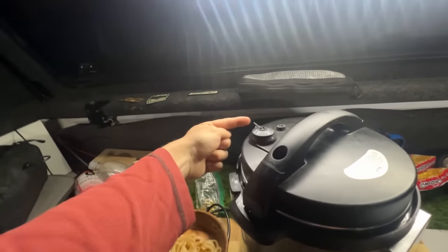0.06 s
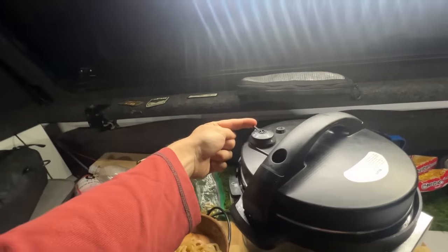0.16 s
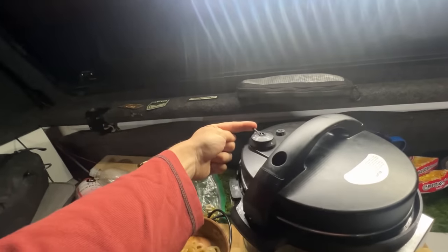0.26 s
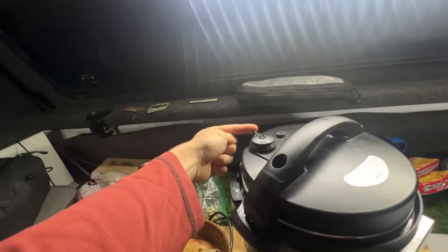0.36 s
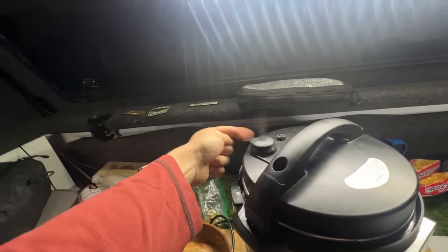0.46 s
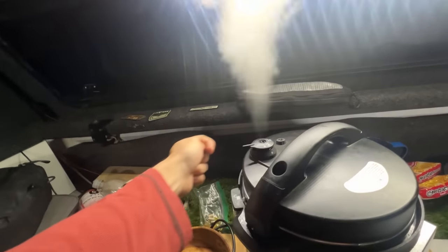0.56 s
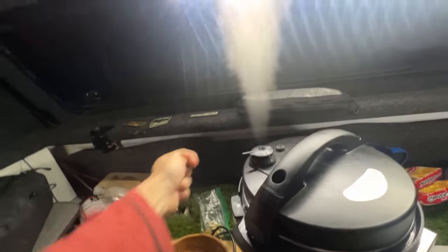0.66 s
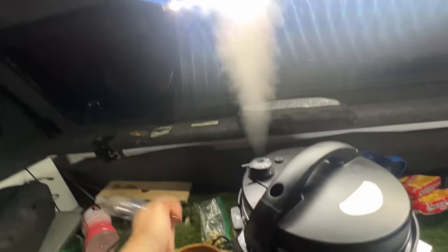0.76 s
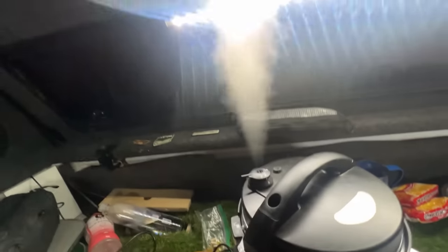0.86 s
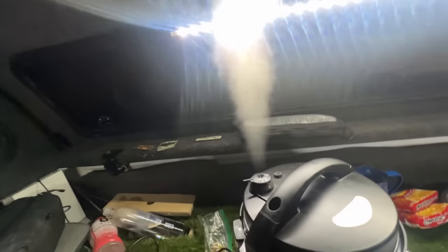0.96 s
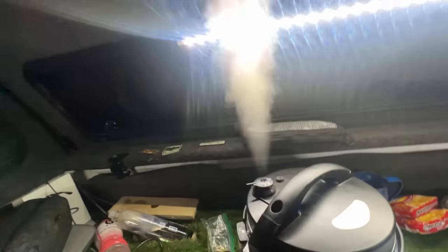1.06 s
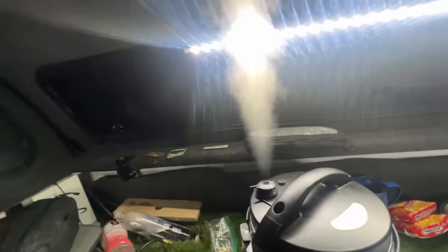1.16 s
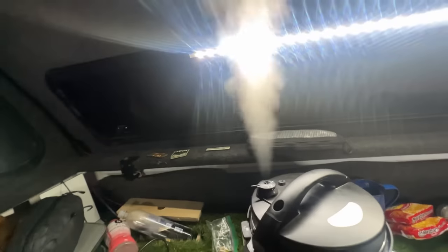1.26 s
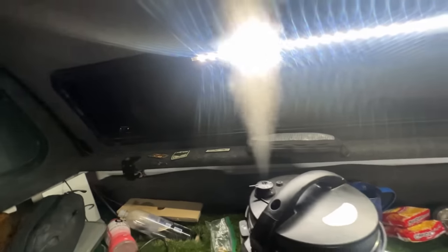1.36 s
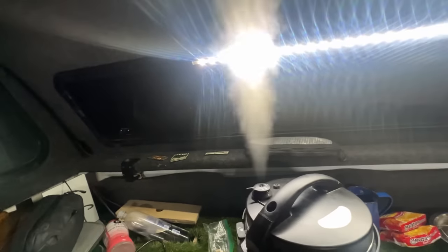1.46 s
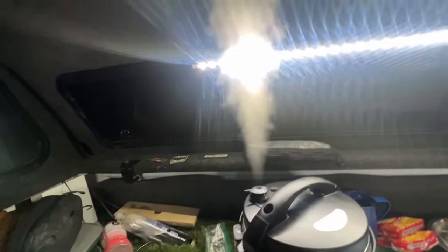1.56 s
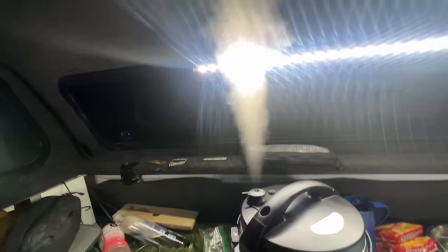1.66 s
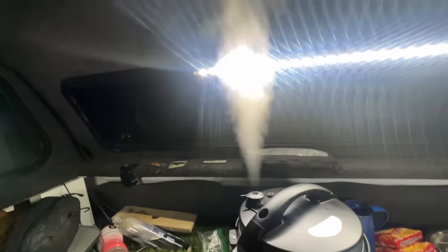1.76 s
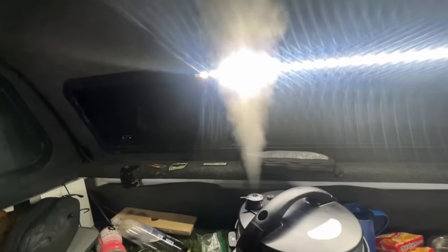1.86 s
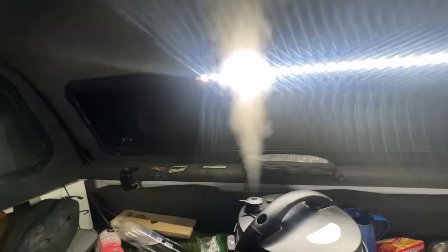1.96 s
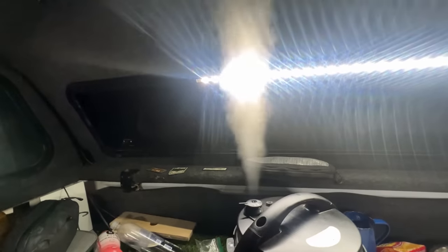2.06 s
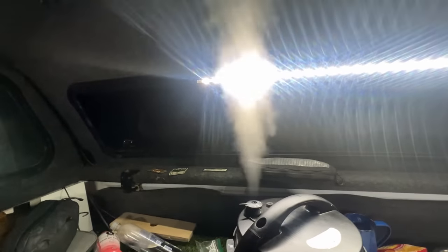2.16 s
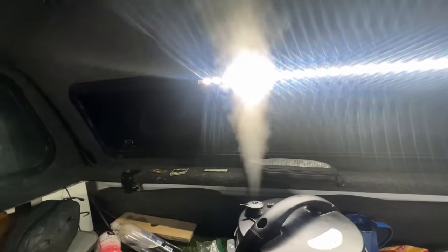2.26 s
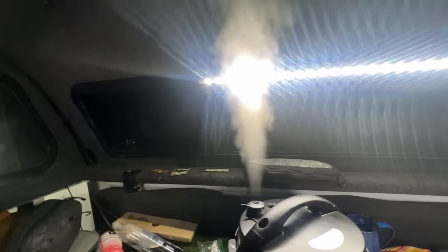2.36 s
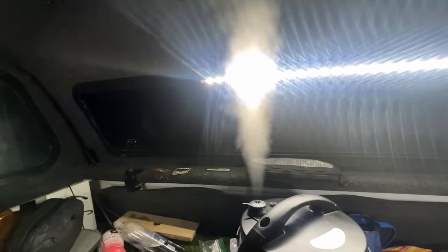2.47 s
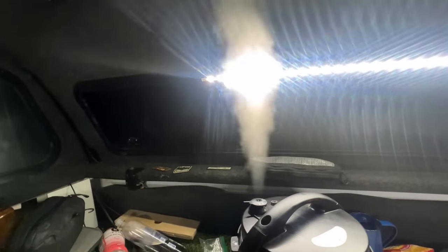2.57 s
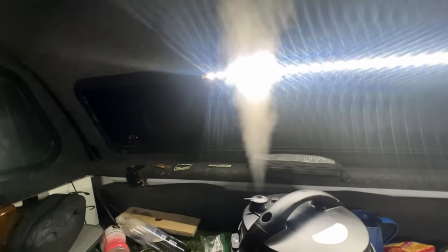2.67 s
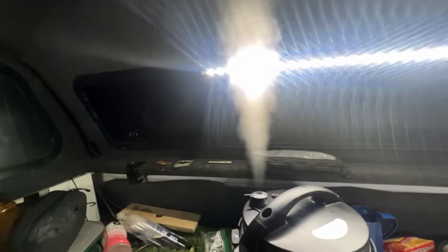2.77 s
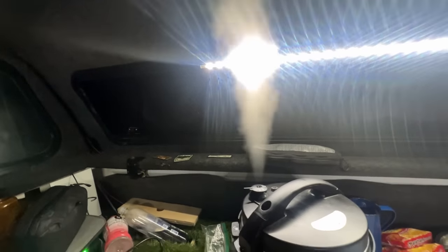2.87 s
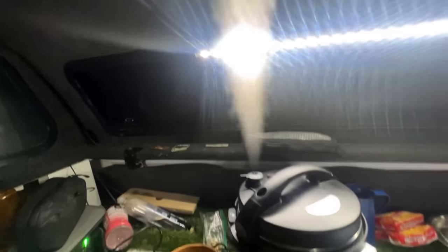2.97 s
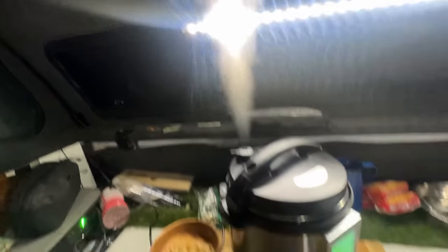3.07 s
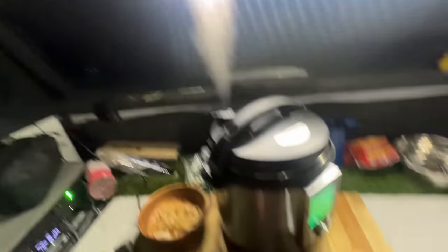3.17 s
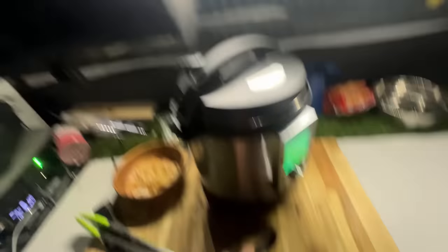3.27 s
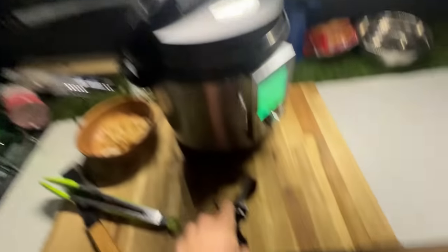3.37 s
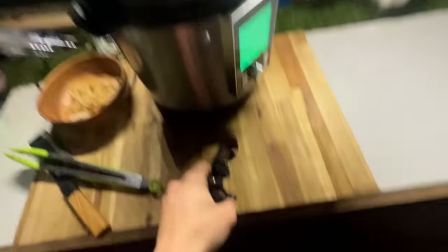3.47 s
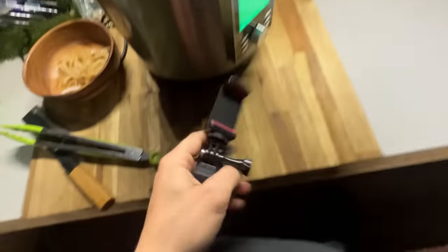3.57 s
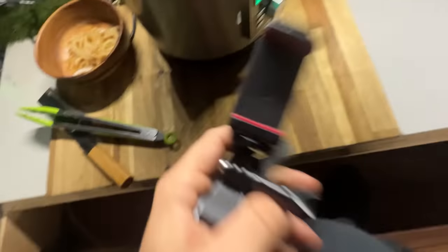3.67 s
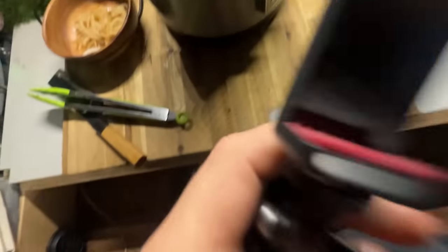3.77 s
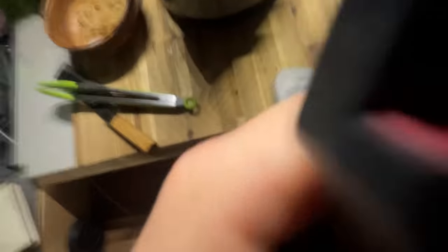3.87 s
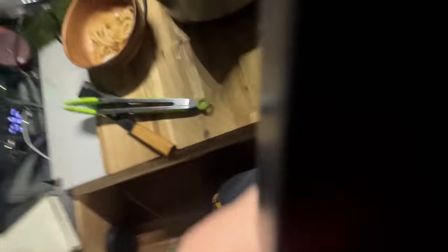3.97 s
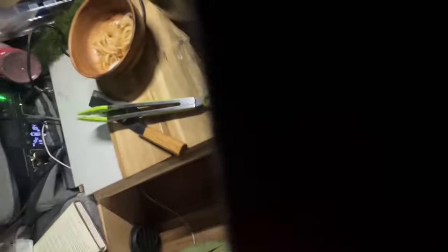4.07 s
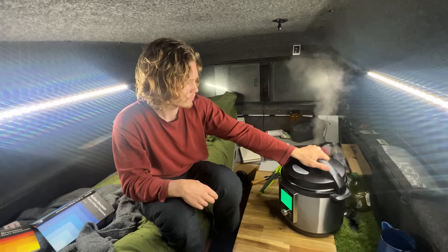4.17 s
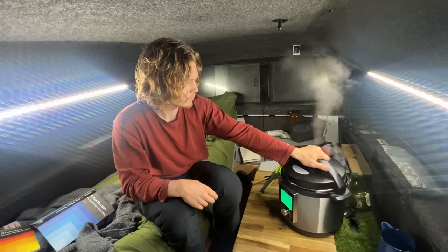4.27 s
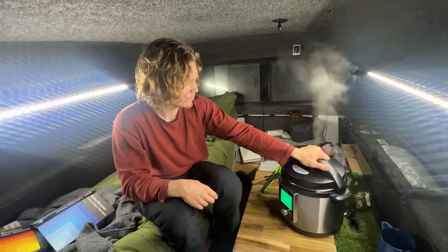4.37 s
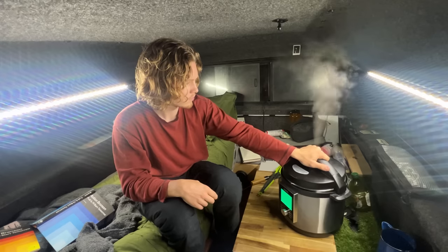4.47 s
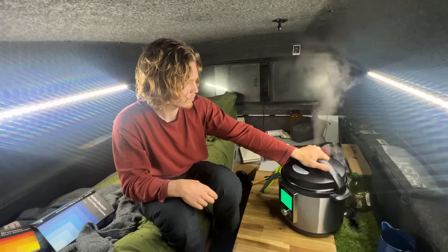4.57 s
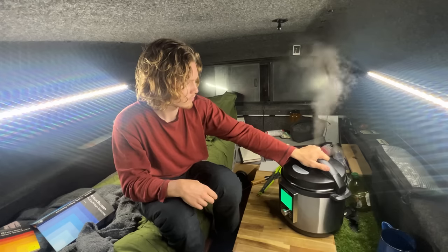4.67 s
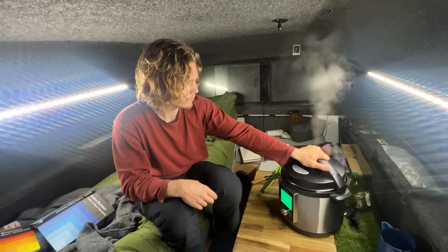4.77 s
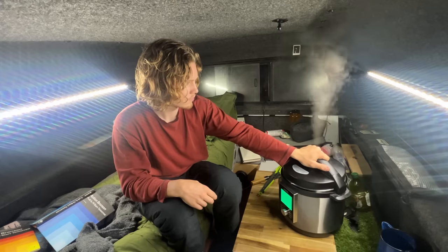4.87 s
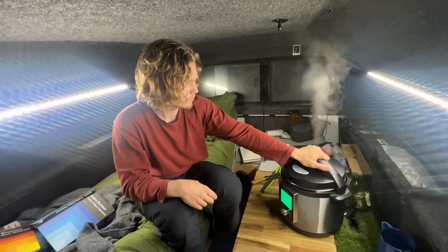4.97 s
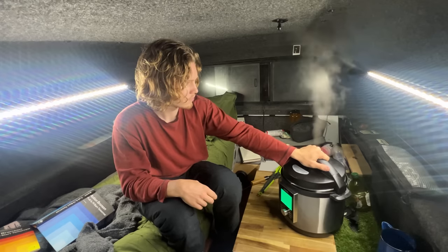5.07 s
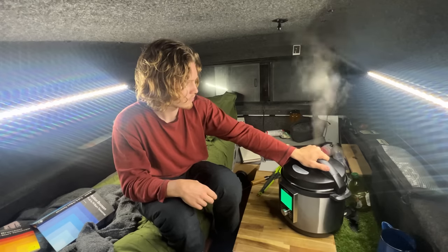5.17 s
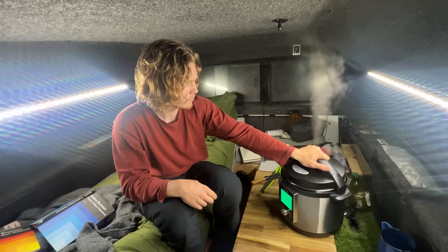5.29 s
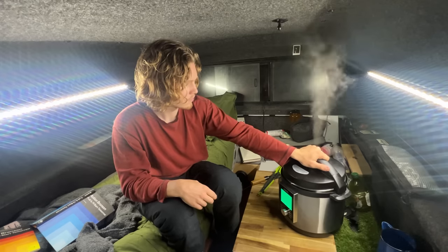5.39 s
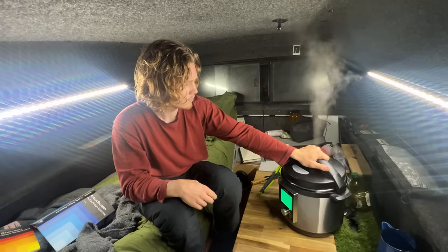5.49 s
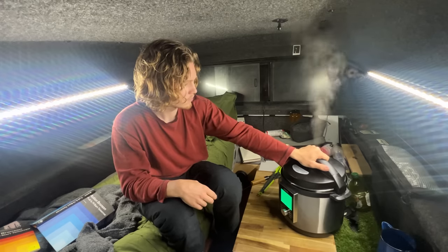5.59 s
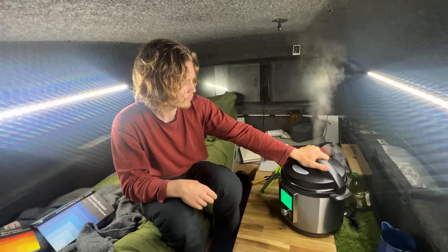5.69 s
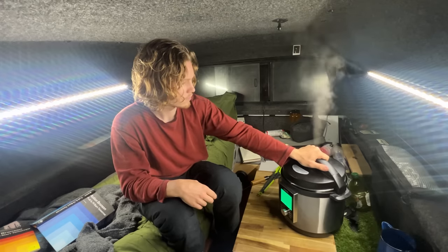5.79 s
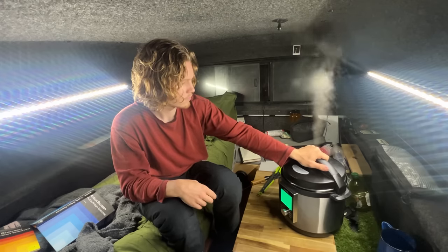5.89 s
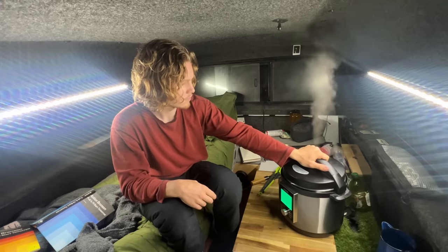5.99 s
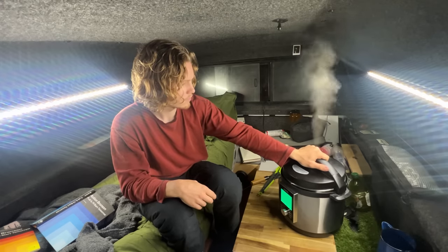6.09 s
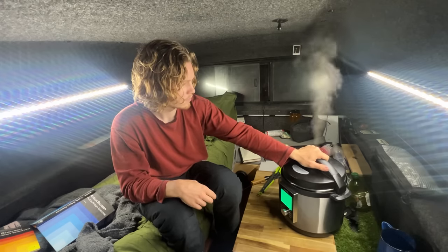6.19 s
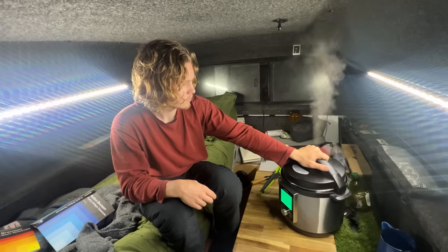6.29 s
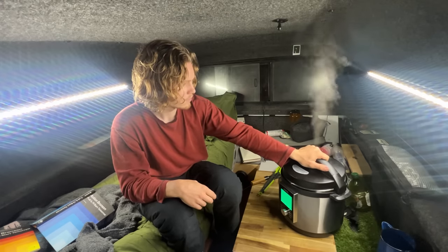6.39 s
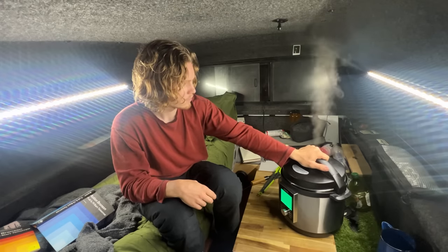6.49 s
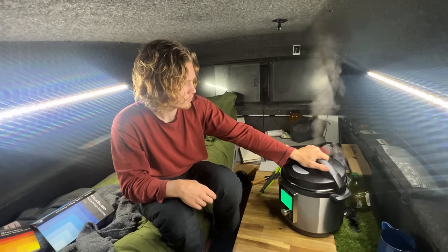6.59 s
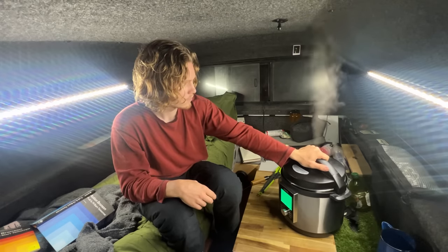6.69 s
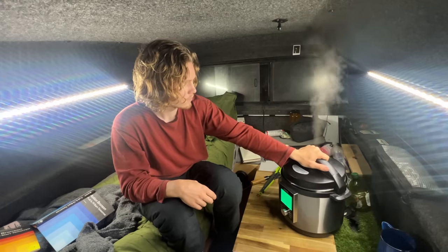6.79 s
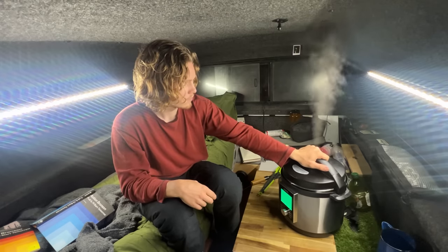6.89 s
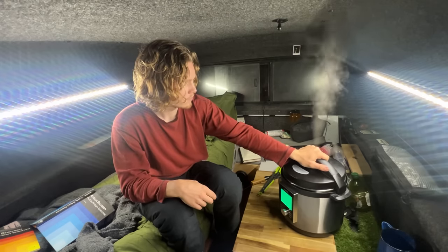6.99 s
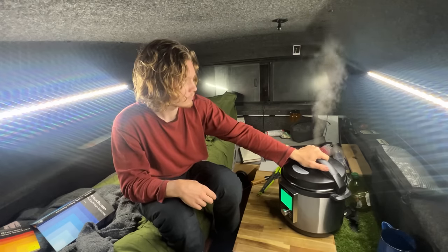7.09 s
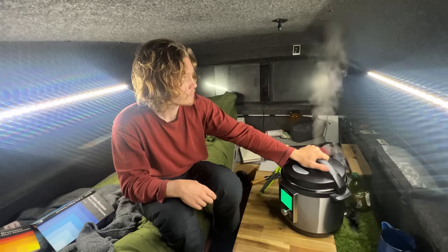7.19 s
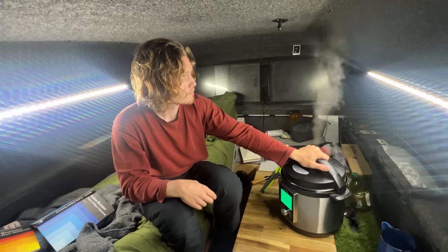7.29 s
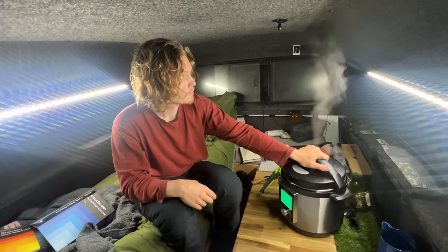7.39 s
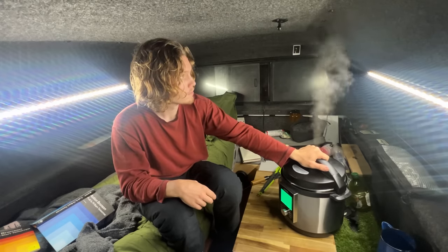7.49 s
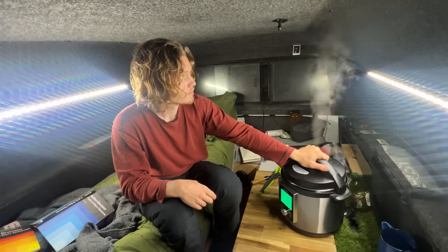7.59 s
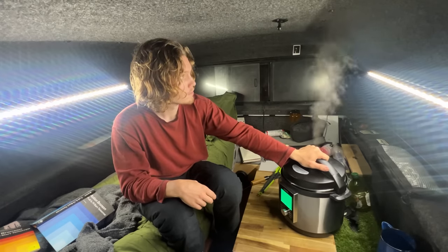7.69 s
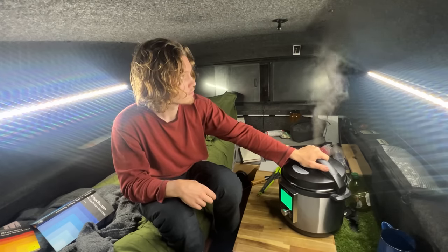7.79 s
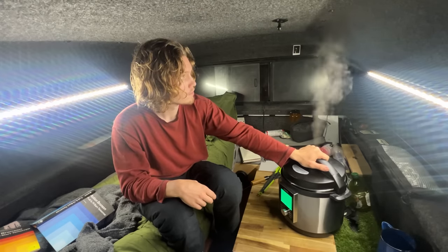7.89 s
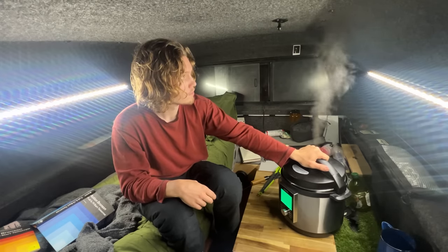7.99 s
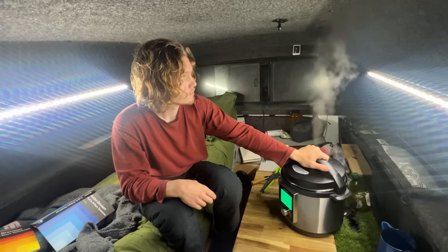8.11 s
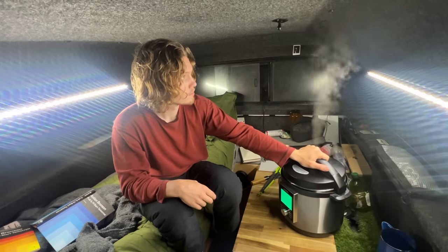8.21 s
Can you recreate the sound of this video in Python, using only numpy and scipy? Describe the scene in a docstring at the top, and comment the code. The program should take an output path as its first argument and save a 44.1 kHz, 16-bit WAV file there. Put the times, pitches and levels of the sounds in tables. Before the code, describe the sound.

Close hand-held stereo microphone in a cramped camper. A soft fan drone plays alone for under half a second, a brief valve scrape follows, and pressurised steam erupts in a harsh sustained hiss. It bleeds off gradually, changes tone as the camera turns away, is interrupted by hard handling knocks near four seconds, then continues quieter and further off, leaning left, with the fan rumbling beneath until the end.

```python
"""A fan drones in a small camper: fuzzy hum, rumble and whirr from shaped noise, over thin air noise and a faint whine.
A finger brushes the valve of an electric pressure cooker, then flicks it open with a scrape of stick-slip ticks.
Steam hisses out over a lower roar from the vent pipe (shaped noise) and rattles the valve on its seat.
The hand-held camera with its two microphone ports is near, turns away, is knocked (decaying modes) and rubbed,
and ends further off with its right port shaded."""
import sys
import numpy as np
from scipy import signal
from scipy.fft import rfft, irfft, next_fast_len
from scipy.io import wavfile
from scipy.ndimage import uniform_filter1d, map_coordinates

SR = 44100
rng = np.random.default_rng(int(sys.argv[2]) if len(sys.argv) > 2 else 0)


def unload_wav(signal):
    """Save mono or channel-first audio to the path in sys.argv[1] as 16-bit WAV at rate SR, clipped to [-1, 1]."""
    wavfile.write(
        sys.argv[1],
        SR,
        np.round(np.clip(np.atleast_2d(signal).T, -1, 1) * 32767).astype(np.int16),
    )


N = 363825

# knocks on the camera: (time [s], level [dB], starting pitch [Hz], ring t60 [s],
# thud relative to the level [dB], cut of ring and crack at the right port [dB])
KNOCK_ROWS = [(3.8798, -9, 1500, .0055, -7, 13), (3.8846, -15, 1650, .007, 3, 16),
              (3.897, -33, 900, .008, 3, 18), (3.925, -33, 1740, .013, 2, 23),
              (3.949, -30, 800, .006, 0, 20), (3.9531, -17, 6400, .004, -20, 20),
              (3.9534, -9.5, 1700, .0125, -13, 17), (3.976, -34, 1600, .01, 7, 18),
              (4.014, -32, 1420, .016, -10, 16), (4.039, -33, 1450, .01, -6, 16),
              (4.051, -31, 1500, .01, -6, 16), (4.057, -24.5, 1290, .008, -5, 20),
              (4.214, -35, 1420, .01, -10, 8), (4.281, -36, 1340, .01, -6, 10),
              (4.3146, -17, 1550, .013, 0, 18), (4.3335, -34, 700, .01, 19, 10),
              (4.336, -25, 1200, .018, 0, 19), (4.3955, -31, 1500, .01, 0, 14)]
# jet treble, near and turned: (frequency [Hz], relative density [dB])
CLOSE_TREBLE = [(9500, -9.5), (10600, -7), (11500, -16), (12300, -16), (13200, -22.5), (14500, -17.5),
                (15700, -16.5)]
# likeness of the channels, near and turned: (frequency [Hz], left-right likeness [0-1])
CLOSE_ALIKE = [(700, .6), (1500, .75), (2300, .55), (2900, .6), (3800, .45), (5500, .35), (8300, .6),
               (9500, 1)]
# phase lead of the right port, bent by the turned camera body: (frequency [Hz], lead [rad])
TURNED_PHASE = [(200, 0.1), (1000, -.2), (2100, 0), (2700, -.7), (3500, -1.6), (4300, -2.8), (6000, -6.3),
                (8500, -7.5), (9500, -9)]


def amp(db):
    """Linear gain of a level in dB."""
    return 10 ** (np.asarray(db) / 20)


def unit(x):
    """x scaled to an rms of 1."""
    return x / np.sqrt(np.mean(x ** 2) + 1e-20)


def along(points, hz):
    """Values of (frequency, value) points, joined on a log frequency axis."""
    f, v = np.transpose(points)
    return np.interp(np.log(hz + 1), np.log(f + 1), v)


def curves(table):
    """One value per sample for each column after the time."""
    s, *cols = np.transpose(table)
    return [np.interp(np.arange(N) / SR, s, c) for c in cols]


def wobble(rate):
    """A smooth random curve, rate knots a second."""
    knots = rng.standard_normal(int(N * rate / SR) + 4)
    return map_coordinates(knots, [np.arange(N) * rate / SR])


def scatter(hz, step_hz):
    """A smooth random curve over frequency: what many small echoes do to the phase."""
    knots = rng.standard_normal(int(SR / 2 / step_hz) + 4)
    return map_coordinates(knots, [hz / step_hz])


def filtered(x, response):
    """x times a complex response of frequency."""
    m = next_fast_len(N + 8192)
    return irfft(rfft(x, m) * response(np.fft.rfftfreq(m, 1 / SR)), m)[..., :N]


def bumps_db(modes, hz):
    """Rounded peaks on a spectrum, in dB."""
    return sum(db / (1 + np.square(np.square(2 * (hz - c) / w))) for c, w, db in modes)


def resonances(modes, hz):
    """Causal response of a few damped modes of alternating sign."""
    total = 0
    for k, (c, w, db) in enumerate(modes):
        damping = 1j * hz * w
        total = total + (-1) ** k * amp(db) * damping / (c * c - hz * hz + damping)
    return total


def patchy(patchy_db, ripple_db=0, ripple_s=1):
    """Two unrelated noises that share short patches of gain and a fine spectral ripple that drifts."""
    z = signal.stft(rng.standard_normal((2, N)), nperseg=1024)[2]

    def field(bins, s):
        across = uniform_filter1d(rng.standard_normal(z.shape[1:]), bins, 0)
        return unit(uniform_filter1d(across, max(round(s * SR / 512), 1), 1))

    gain_db = patchy_db * field(10, .05) + ripple_db * field(2, ripple_s)
    return signal.istft(z * amp(gain_db), nperseg=1024)[1][:, :N]


def pair(noises, gain, alike, lead=lambda hz: 0 * hz):
    """Stereo noise with a gain for each channel, a likeness and a phase lead of the right channel."""
    m = next_fast_len(N + 8192)
    hz = np.fft.rfftfreq(m, 1 / SR)
    same, other = rfft(noises, m)
    turn = np.arccos(np.clip(along(alike, hz), 0, 1)) / 2
    left = (np.cos(turn) * same + np.sin(turn) * other) * np.exp(-1j * lead(hz))
    right = np.cos(turn) * same - np.sin(turn) * other
    return irfft(gain(hz) * np.array([left, right]), m)[..., :N]


def rubbing(gain, modes, slips_per_s, smooth, lean_db):
    """Stick-slip ticks of uneven size, with some smooth noise, ring a part while it is rubbed."""
    ticks = (rng.random(N) < slips_per_s / SR) * rng.standard_normal(N)
    slips = ticks + smooth * rng.standard_normal((2, N))
    ring = unit(filtered(slips, lambda hz: resonances(modes, hz) / (1 + 1j * hz / 2500) ** 2))
    return gain * ring * amp([[lean_db / 2], [-lean_db / 2]])


def strokes(rows, rise_db_per_s, fall_db_per_s):
    """Gain of strokes that rise, hold and die away."""
    t = np.arange(N) / SR
    total = 0
    for s, hold, db in rows:
        rise_db = rise_db_per_s * np.clip(s - t, 0, None)
        fall_db = fall_db_per_s * np.clip(t - s - hold, 0, None)
        total = total + amp(db - rise_db - fall_db)
    return total


def cabin():
    """A fan's hum, rumble and whirr, noise through modes and slopes, over thin air noise and a whine."""
    # modes of hum (applied twice) and whirr: (frequency [Hz], width [Hz], relative level [dB])
    hum_modes = [(177.3, 38.6, 23.5), (213.4, 22, -6)]
    whirr_modes = [(279.4, 7.7, 5.5), (346, 33, -5), (416.7, 18, -4.5), (462, 36, -10.5), (592, 14, -21.5)]
    # (frequency [Hz], relative density [dB])
    rumble_slope = [(15, -52), (25, -31), (43, -33), (81, -13), (150, -12), (200, -32), (330, -120)]
    # (frequency [Hz], left-right likeness [0-1])
    fan_alike = [(60, 1), (170, 0.91), (280, 1), (600, 0.092)]
    # (time [s], hum level [dB], rumble level [dB], whirr level [dB]); steady after the last row
    fan_levels = [(0, -36, -48.5, -58), (.15, -49, -48, -62.5), (.6, -43.5, -48, -58), (1.2, -49, -52, -60),
                  (1.72, -53, -59.5, -64), (1.9, -64.5, -70, -74), (2.2, -57, -65, -109),
                  (2.45, -52, -77, -101), (2.75, -54.5, -60.5, -75), (3.05, -55.5, -63, -57.5),
                  (3.27, -69, -63, -66), (3.7, -60.5, -73, -90), (3.85, -53, -47.5, -56),
                  (4.05, -45, -42.5, -67), (4.3, -47, -38.5, -43.5), (4.47, -39, -39.5, -52),
                  (5.4, -43.5, -38, -50.5)]
    # quiet cabin air: (frequency [Hz], relative density [dB])
    air_slope = [(300, -5.5), (600, -18.5), (1000, -17.5), (1900, -18.5), (2400, -31), (4000, -35.5),
                 (7000, -33.5), (9000, -36), (11000, -72), (12000, -120)]
    # a faint hiss band in the air: (frequency [Hz], width [Hz], height [dB])
    air_bumps = [(7500, 290, 11)]
    whine_hz, whine_db = 1276, -70

    def voices(hz):
        hum = resonances(hum_modes, hz) ** 2
        whirr = resonances(whirr_modes, hz) * (hz > 225)
        return np.array([hum, amp(along(rumble_slope, hz)), whirr])[:, None]

    def air_gain(hz):
        return amp(along(air_slope, hz) + bumps_db(air_bumps, hz))

    hum_db, rumble_db, whirr_db = curves(fan_levels)
    hum, rumble, whirr = map(unit, pair(rng.standard_normal((2, N)), voices, fan_alike))
    fan = amp(hum_db) * hum + amp(rumble_db) * rumble + amp(whirr_db) * whirr
    air = unit(pair(patchy(2.2), air_gain, [(1000, 0.033)]))
    air_db = -41.5 + .24 * whirr_db  # the air noise sinks a little with the whirr
    whine_phase = 2 * np.pi * whine_hz * np.arange(N) / SR + .6 * wobble(20)
    whine = np.sqrt(2) * np.sin(whine_phase) * amp(whine_db + 1.4 * wobble(14))
    return fan + amp(air_db) * air + whine


def finger_brush():
    """A finger brushes the valve: dense small slips through two broad modes."""
    # (time [s], hold [s], level [dB])
    brush_strokes = [(.235, .004, -66)]
    # (frequency [Hz], width [Hz], relative level [dB])
    brush_modes = [(2500, 1300, -2), (4500, 2700, -1)]
    gain = strokes(brush_strokes, rise_db_per_s=2500, fall_db_per_s=450)
    return rubbing(gain, brush_modes, slips_per_s=2400, smooth=.3, lean_db=5)


def valve_scrape():
    """The valve creeps, then turns in jerks: stick-slip ticks ring its modes."""
    # (time [s], hold [s], level [dB])
    turn_strokes = [(.431, .017, -50), (.453, 0.014, -25), (.482, 0.016, -32)]
    # (frequency [Hz], width [Hz], relative level [dB])
    valve_modes = [(334, 74, -3), (590, 33, 7), (900, 93, 4), (1240, 350, -0.5)]
    gain = strokes(turn_strokes, rise_db_per_s=3500, fall_db_per_s=600)
    return rubbing(gain, valve_modes, slips_per_s=620, smooth=0.21, lean_db=2.5)


def pressure_db():
    """Level of hiss, middle and roar: a leak, a blast that bleeds off, a slow sag as the pot empties."""
    leak_s, open_s, opening_s = 0.4513, .463, 0.0014  # the valve leaks first, then opens fully
    # each list: hiss, soft middle, vent roar
    leak = np.c_[[-31, -11, -24]]  # dB under the full jet
    full = np.c_[[-17, -37, -30.5]]  # dB at opening, ahead of the camera's gains
    blast = np.c_[[4.5, 7.5, 7.5]]  # dB lost as the first surplus of pressure bleeds off
    bleed = np.c_[[0.82, 0.39, 0.53]]  # time constant of that loss, s
    sag = np.c_[[1.5, 1.08, 0.99]]  # dB per s
    t = np.arange(N) / SR
    since = np.clip(t - open_s, 0, None)
    shut = leak * np.clip(1 - since / opening_s, 0, 1) - 200 * (t < leak_s)
    return full + shut - blast * (1 - np.exp(-since / bleed)) - sag * since


def jet(noises, spectra, walls, treble, treble_db, alike, phase, blur):
    """The jet in one camera place: turbulence noise as hiss, soft middle and vent roar of rms 1 each."""
    treble_hz, delay_s = 9500, 12.8 / SR  # above treble_hz the left channel is delayed and inverted
    # how much small echoes blur the phase: (frequency [Hz], share [0-1])
    echo_share = [(1000, 1), (1500, .4), (4000, .4), (5000, 1)]

    def bands(hz):
        top_db = along(treble, hz) + treble_db
        colour_db = [np.where(hz > treble_hz, top_db, along(s, hz) + bumps_db(w, hz))
                     for s, w in zip(spectra, walls)]
        colour = amp(colour_db) * hz ** 3 / (hz ** 3 + 550 ** 3)  # low cut
        dull = 1 / (1 + (hz / 4200) ** 12)
        roar = 1 / (1 + (hz / 2500) ** 12)
        return np.array([colour * (1 - dull), colour * (dull - roar), colour * roar])

    def lead(hz):
        echoes = blur * along(echo_share, hz) * scatter(hz, step_hz=89.72)
        delayed = np.pi + 2 * np.pi * hz * delay_s
        return np.where(hz > treble_hz, delayed, along(phase, hz) + echoes)

    # one shared noise comes to feed both channels just above treble_hz
    return [unit(band) for band in pair(noises, bands, alike + [(treble_hz + 400, 1)], lead)]


def near_jet():
    """The jet close by, coloured by reinforcements from the close cabin walls."""
    # jet at each port: (frequency [Hz], relative density [dB])
    left = [(700, -23.5), (1000, -21), (1500, -12), (2200, -15), (2700, -11.5), (3100, -5), (3600, -7),
            (4200, -9.5), (5200, -7), (6300, -4.5), (7500, -3), (8600, -4), (9600, -9)]
    right = [(700, -27.5), (1000, -25.5), (1500, -14), (2200, -18), (2700, -10.5), (3100, -5.5),
             (3600, -10.5), (4200, -10.5), (5200, -17), (6300, -12.5), (7500, -8), (8600, -4), (9600, -9.5)]
    # wall reinforcements: (frequency [Hz], width [Hz], height [dB])
    left_walls = [(1340, 110, 4.5), (1560, 160, 5), (1730, 140, 6.5), (2000, 100, 4), (4470, 200, 2),
                  (4900, 250, 3), (5830, 150, 4), (6120, 80, 4), (6250, 100, 5), (6500, 90, 4),
                  (7200, 200, 3), (7700, 120, 3), (8250, 130, 5), (8490, 100, 4), (8830, 100, 3)]
    right_walls = [(1150, 120, 3), (1600, 360, 6), (1990, 90, 5), (4900, 120, 4), (6800, 150, 5),
                   (7080, 100, 3), (7820, 150, 3), (8270, 100, 3), (8620, 160, 5), (9300, 150, 2)]
    # phase lead of the right port, bent by the camera body: (frequency [Hz], lead [rad])
    near_phase = [(200, 0.1), (600, -2.1), (1100, 0.1), (1600, 1.8), (2000, 0.1), (2700, -.7), (3500, -1.6),
                  (4300, -2.8), (5200, -4.2), (6300, -5.2), (7200, -6.5), (8800, -6.6), (9500, -9)]
    return jet(patchy(1.5, ripple_db=4, ripple_s=.6), (left, right), (left_walls, right_walls),
               CLOSE_TREBLE, 0, CLOSE_ALIKE, near_phase, blur=0.98)


def turned_jet():
    """The jet with the camera turned away, its treble weaker."""
    # jet at each port: (frequency [Hz], relative density [dB])
    left = [(700, -38), (1000, -21.5), (1500, -17.5), (1900, -23), (2300, -14), (2800, -27), (3500, -12.5),
            (4200, -13), (5200, 0.5), (6300, -1), (7500, -1.5), (8600, -9), (9600, -17)]
    right = [(700, -36), (1000, -21), (1500, -21), (1900, -17), (2300, -19), (2800, -19), (3500, -20),
             (4200, -9.5), (5200, -10.5), (6300, -10), (7500, -13), (8600, -7), (9600, -7.5)]
    # wall reinforcements at both ports: (frequency [Hz], width [Hz], height [dB])
    both_walls = [(1300, 45, 1.3), (1645, 260, 15), (2100, 110, 2.1)]
    return jet(patchy(1.1, ripple_db=3, ripple_s=.2), (left, right), (both_walls, both_walls),
               CLOSE_TREBLE, -6.5, CLOSE_ALIKE, TURNED_PHASE, blur=0.92)


def far_jet():
    """The jet from further off, with the right port shaded."""
    # jet at each port: (frequency [Hz], relative density [dB])
    left = [(700, -12), (1000, -18), (1500, -15.5), (2200, -25), (3100, -13.5), (4200, -15.5), (5200, -9.5),
            (6300, -1.5), (7500, -5), (8600, -16), (9600, -12)]
    right = [(700, -14.5), (1000, -23), (1500, -24), (2200, -25), (3100, -22.5), (4200, -23), (5200, -19.5),
             (6300, -19.5), (7500, -17.5), (8600, -20), (9600, -12)]
    # wall reinforcements: (frequency [Hz], width [Hz], height [dB])
    left_walls = [(860, 180, 2), (1070, 130, 7), (1420, 170, 10), (1720, 140, 5), (1960, 80, 5),
                  (2330, 160, 3), (2580, 120, 4), (2930, 160, 6), (3320, 80, 3), (3700, 200, 6),
                  (4160, 140, 6), (4350, 80, 5), (4690, 120, 5), (5080, 110, 6), (5345, 100, 11),
                  (5755, 160, 11), (5990, 130, 12), (6230, 90, 4), (6480, 100, 8), (6685, 180, 9),
                  (7020, 90, 7), (7410, 70, 5), (7560, 90, 5), (7800, 160, 7), (8030, 200, 9),
                  (8790, 200, 6)]
    right_walls = [(970, 80, 5), (1430, 100, 7), (1720, 160, 6), (2050, 150, 5), (2970, 170, 5),
                   (3940, 200, 6), (4800, 200, 4), (5490, 150, 9), (5750, 170, 9), (6500, 200, 5),
                   (7020, 100, 6), (7400, 110, 4), (7880, 110, 4), (8200, 120, 5), (9100, 130, 5)]
    # treble: (frequency [Hz], relative density [dB])
    far_treble = [(9500, -21.5), (10400, -24.5), (11000, -30), (12000, -17.5), (12900, -16.5), (13600, -21),
                  (14300, -29), (15000, -35), (15700, -42)]
    # (frequency [Hz], left-right likeness [0-1])
    far_alike = [(700, .6), (1500, .8), (3000, .5), (5000, .6), (7000, .89), (9500, .6)]
    # phase lead of the right port: (frequency [Hz], lead [rad])
    far_phase = [(300, .2), (750, 2.5), (1050, 1.6), (1300, 2.9), (2000, 3.9), (2400, 5.3), (2800, 7.9),
                 (3750, 13), (4250, 12.4), (5600, 15.6), (6500, 18.8), (7500, 19), (9500, 22.5)]
    return jet(patchy(.8, ripple_db=.9, ripple_s=1.5), (left, right), (left_walls, right_walls),
               far_treble, 0, far_alike, far_phase, blur=0.57)


def left_blended(channels):
    """The left channel shifts in time, its mid band partly a phase-turned copy of the right's."""
    # (time [s], time lead of the left channel [us], share of its band replaced by the copy [0-1])
    blend_path = [(0, 70, .15), (.65, 60, .15), (.75, 60, .6), (.95, 60, .3), (1.25, 0, 0), (2.3, -5, 0),
                  (3.05, 15, .3), (3.2, 45, .85), (3.26, 80, 1), (3.36, 140, 1), (3.41, 165, .9),
                  (3.5, 235, .5), (3.6, 235, .1), (4.6, 235, 0)]
    low_hz, high_hz = 1900, 4600

    def swap(hz):  # takes the left channel's own noise out and puts the copy in
        copy = np.exp(-1j * along(TURNED_PHASE, hz))
        return (hz > low_hz) * (hz < high_hz) * np.array([-1 + 0 * hz, copy])

    lead_us, copied = curves(blend_path)
    left = channels[0] + copied * filtered(channels, swap).sum(0)
    shifted = map_coordinates(left, [np.arange(N) + lead_us * SR / 1e6], mode="nearest")
    return np.array([shifted, channels[1]])


def dips_db():
    """The steam's level dips briefly in each channel after a knock, deeper after a hard one."""
    depth_db = np.c_[[31, 6]]  # left and right, for a knock of 0 dB
    after_s, recovery_s = 0.0023, 0.0032
    t = np.arange(N) / SR - after_s
    return -depth_db * sum(amp(db) * (t > s) * np.exp(-abs(t - s) / recovery_s)
                           for s, db, *_ in KNOCK_ROWS)


def steam():
    """The steam jet: three camera places cross-fade by square-root gains; the flow flutters a little."""
    # (time [s], place [0 near, 1 turned, 2.29 far], jet gain [dB], extra middle [dB],
    # extra roar [dB], level of left over right [dB])
    camera_path = [(0, 0.17, 1.5, 5, -1.5, -1), (1.1, 0.034, 0.5, -4.5, 1, -1.5),
                   (1.6, 0.012, -0.3, -9.5, 1.5, -2), (1.95, 0.11, -1, -4.5, -0.5, -0.5),
                   (2.5, .05, 1, -12, 0.5, -0.5), (2.95, 0.014, 2.5, -12, -2, -1.5),
                   (3.24, 0.7, 0, 6.5, 2.5, 0.3), (3.42, 1.33, 2.5, 4, 3, 0.8),
                   (3.875, 0.94, 3, 0.5, 3.5, 0), (3.882, 0.55, -7, 1, 9, 1), (3.952, 1.9, 0, 3, 4, 2),
                   (3.96, 1.75, -5.5, -4, -11, 0), (4.15, 1.54, -4, 0.5, 2.5, 2),
                   (4.5, 1.92, -3.5, -1.5, 1.5, -1.5), (4.65, 2.37, -7.5, -5.5, 1.4, 0.1),
                   (8.25, 2.49, -7, -5.2, 2.7, 0.1)]
    place, gain_db, more_middle_db, more_roar_db, lean_db = curves(camera_path)
    hiss_db, middle_db, roar_db = pressure_db()
    levels = amp([hiss_db, middle_db + more_middle_db, roar_db + more_roar_db])

    def share(spot):
        return np.sqrt(np.clip(1 - abs(place - spot), 0, 1))

    near_share, turned_share = share(0), share(1)
    hiss, middle, roar = (g * (near_share * a + turned_share * b)
                          for g, a, b in zip(levels, near_jet(), turned_jet()))
    far = share(2.29) * sum(g * c for g, c in zip(levels, far_jet()))
    flow = hiss + left_blended(middle + roar) + far
    flutter_db = .5 * wobble(4.7) + 0.11 * wobble(25)
    return flow * amp(gain_db + flutter_db + dips_db() + [lean_db / 2, -lean_db / 2])


def seat_chatter():
    """The first steam rattles the valve on its seat: irregular ticks ring the seat's modes."""
    # (time [s], hold [s], level [dB])
    rattles = [(.469, 0.012, -32), (.484, 0.0068, -31), (.503, 0.0044, -43)]
    # (frequency [Hz], width [Hz], relative level [dB])
    seat_modes = [(850, 120, -2), (1430, 210, -3), (1950, 370, -10)]
    gain = strokes(rattles, rise_db_per_s=4000, fall_db_per_s=900)
    return rubbing(gain, seat_modes, slips_per_s=820, smooth=0.12, lean_db=8)


def knocks():
    """Each knock rings the camera shell by the left port for a few cycles and thuds through to the right."""
    sag_per_s = 24  # share of its starting pitch lost per second as the contact deepens
    body_hz, body_db, body_t60_s = 880, -5, 0.011  # a lower mode of the shell
    thud_hz, thud_t60_s, thud_lag = 290, 0.018, 1.9  # lag at the right port in radians
    out, t = np.zeros((2, N)), np.arange(SR // 20) / SR
    rise = np.square(1 - np.exp(-t / .0003))
    body = amp(body_db - 60 * t / body_t60_s) * np.sin(2 * np.pi * body_hz * t) * rise
    thud_wave = np.sin(2 * np.pi * thud_hz * t - np.c_[[0, thud_lag]]) * (1 - np.exp(-t / 0.0017))
    for s, db, hz, t60, thud_db, right_cut_db in KNOCK_ROWS:
        cycles = hz * (t - sag_per_s * t * t / 2)
        ring = 1.53 * amp(-60 * t / t60) * np.sin(2 * np.pi * cycles) * rise
        grit = uniform_filter1d(rng.standard_normal(len(t)), size=7)
        crack = .5 * amp(-60 * t / .008) * rise * grit
        shell = (ring + body + crack) * amp([[3], [-right_cut_db]])
        thud = amp(thud_db - 60 * t / thud_t60_s) * thud_wave
        out[:, round(s * SR):][:, :len(t)] += amp(db) * (shell + thud)
    return out


def hand_rubs():
    """A hand rubs the camera: sparse stick-slip ticks ring its plastic shell."""
    # (time [s], hold [s], level [dB])
    rub_strokes = [(3.92, 0.027, -51), (3.976, 0.087, -42.5), (4.41, 0.066, -59)]
    # (frequency [Hz], width [Hz], relative level [dB])
    shell_modes = [(344, 250, -6), (1430, 330, 5)]
    gain = strokes(rub_strokes, rise_db_per_s=900, fall_db_per_s=1100)
    return rubbing(gain, shell_modes, slips_per_s=300, smooth=.05, lean_db=8)


def scene():
    """All sources in the two channels, left and right."""
    valve = finger_brush() + valve_scrape() + seat_chatter()
    handling = knocks() + hand_rubs()
    return cabin() + valve + steam() + handling


def record(dry):
    """The camera keeps nothing above its band limit."""
    top_hz = 15870
    return filtered(dry, lambda hz: np.clip((top_hz - hz) / 150, 0, 1) ** 2)


dry = scene()
out = record(dry)
unload_wav(out)
```